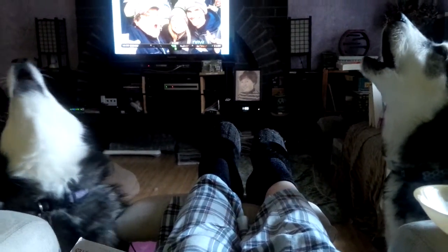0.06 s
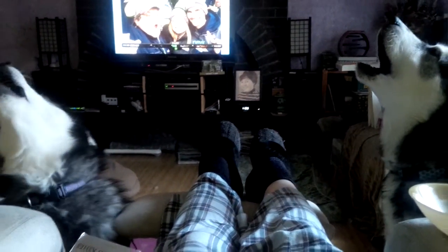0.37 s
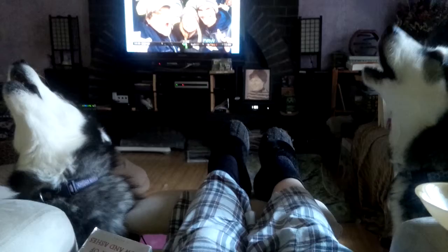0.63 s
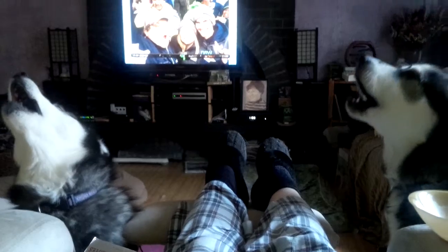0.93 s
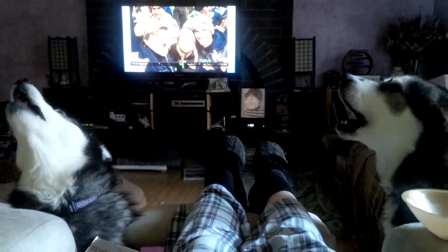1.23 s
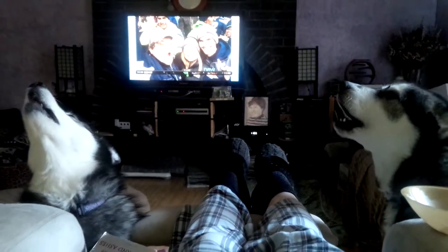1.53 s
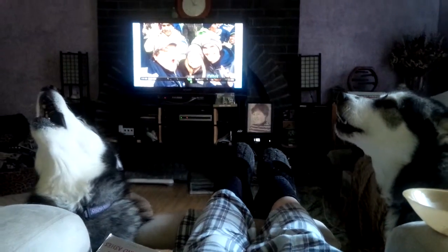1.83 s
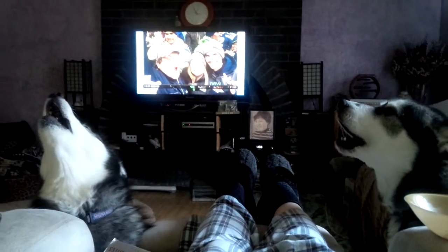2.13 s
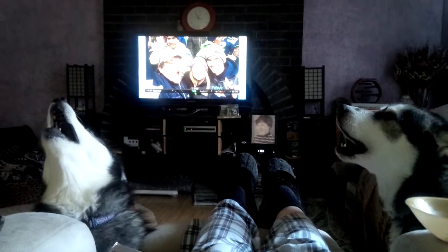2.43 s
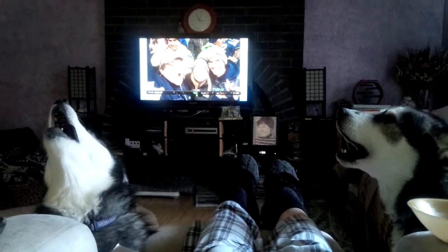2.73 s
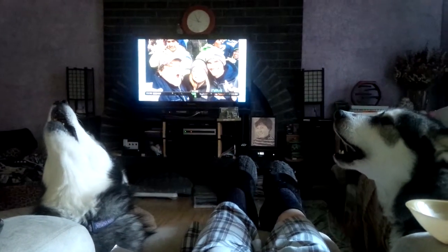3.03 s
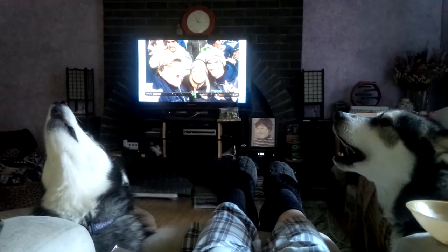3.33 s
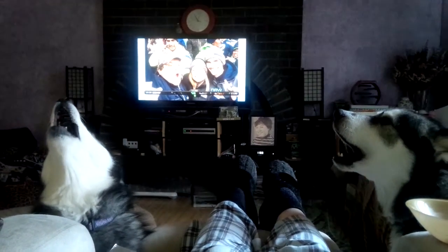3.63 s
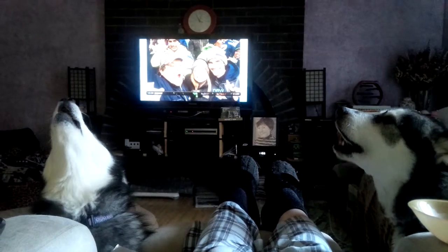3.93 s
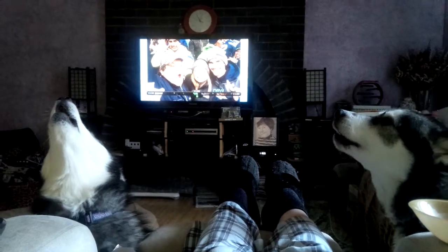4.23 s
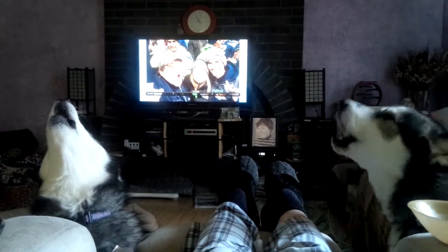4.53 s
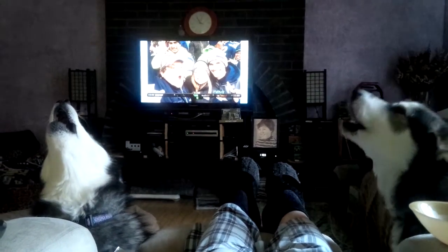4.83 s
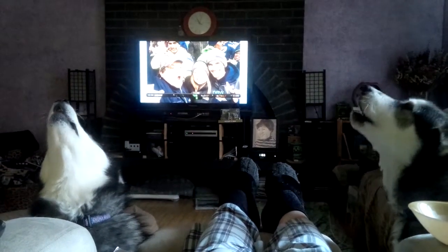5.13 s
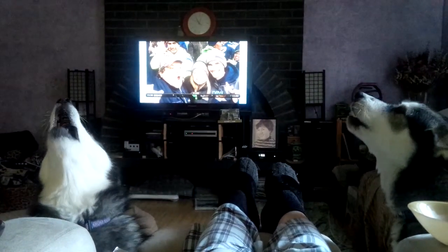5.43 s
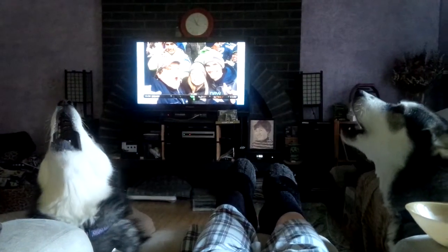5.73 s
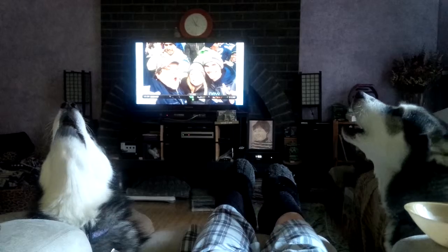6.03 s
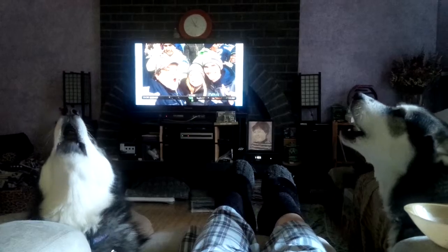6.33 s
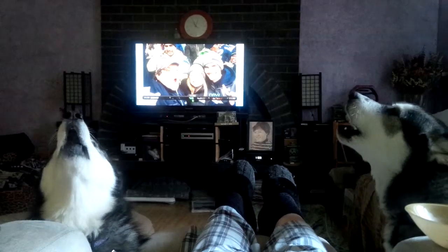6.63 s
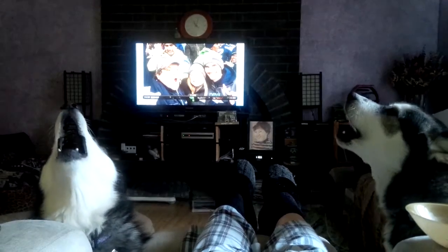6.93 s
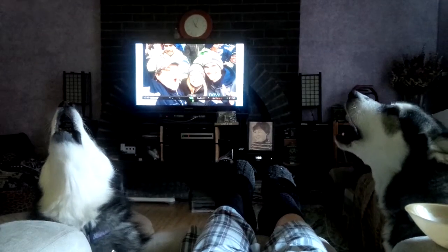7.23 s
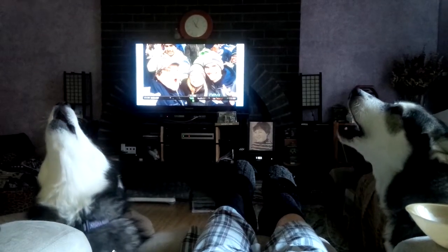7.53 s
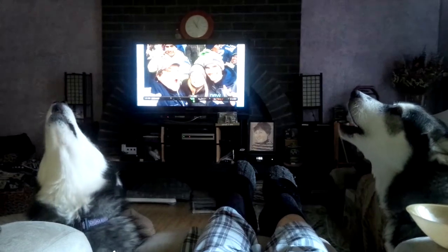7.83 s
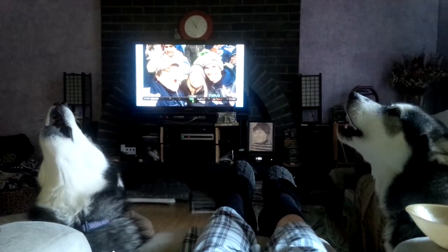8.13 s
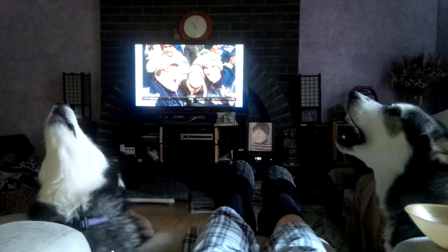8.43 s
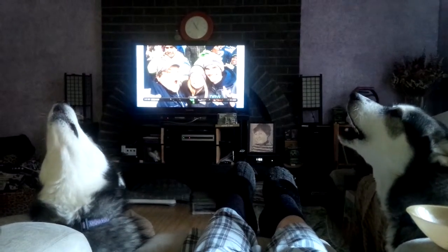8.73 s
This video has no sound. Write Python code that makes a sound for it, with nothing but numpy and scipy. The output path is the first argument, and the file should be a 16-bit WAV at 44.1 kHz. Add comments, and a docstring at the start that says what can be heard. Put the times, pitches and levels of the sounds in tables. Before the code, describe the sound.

A dog's howl and a second dog's high, cracked squeal open a loud duet in a small room with a short echo. The two nearby voices overlap in long, sliding tones, easing off around the middle for gasps, wet lip clicks and a faint whine. They then build again; one dog squeals and restarts hoarsely, and the other's howl briefly roughens into a growl.

```python
"""Two large dogs howl in a living room; their vibrating vocal folds make tones that swoop, hold and beat.
The left dog starts at once, while the right dog cracks into a two-toned squeal before it howls too.
From 2 s the right voice keeps breaking to a lower note. From 3 s come snatched breaths and lip smacks,
and at 4 s a thin whine through the nose. Near 7.5 s the right dog squeals again and starts its last howl
hoarsely; just after 8 s the left dog's voice turns to a growl."""
import sys
import numpy as np
from scipy import signal
from scipy.fft import rfft, irfft, next_fast_len
from scipy.io import wavfile
from scipy.ndimage import uniform_filter1d, map_coordinates

SR = 44100
rng = np.random.default_rng(int(sys.argv[2]) if len(sys.argv) > 2 else 0)


def write(x):
    x = np.atleast_2d(x).T
    wavfile.write(sys.argv[1], SR, np.round(np.clip(x, -1, 1) * 32767).astype(np.int16))


N = 386757
CUTOFF_HZ = 13900

# the tone colour of a rough throat: (frequency [Hz], level [dB])
RASP = [(200, -51.5), (550, 7), (750, -5), (1000, -2.5), (1200, -14), (1450, 0), (1900, -16.5),
        (2300, -2.5), (2800, -22.5), (5000, -22.5), (8000, -17.5), (10000, -26.5), (13000, -38)]
# caps on a voice's parts, before each dog's own gains: (base tone [dB], octave [dB], mouth [dB], edge [dB])
FULL_VOICE = (-11, -18, -20, -43)


def gain_of(db):
    """Turns decibels into a multiplier."""
    return 10 ** (np.asarray(db) / 20)


def evened(x):
    """Scales a signal to an average strength (rms) of 1."""
    return x / np.sqrt(np.mean(x ** 2) + 1e-20)


def eased(x, seconds):
    """Smooths with a moving average."""
    return uniform_filter1d(x, max(int(seconds * SR), 1))


def read(points, hz):
    """Looks up a frequency in a table, blending between rows."""
    f, value = np.transpose(points)
    return np.interp(np.log(hz + 1), np.log(f + 1), value)


def curves(rows):
    """A table's start time, and its other columns sample by sample."""
    times, *columns = np.transpose(rows)
    t = np.arange(times[0], times[-1], 1 / SR)
    return times[0], [np.interp(t, times, c) for c in columns]


def add(mix, start, sound, fade_s=.008):
    """Mixes in a sound with short soft ends."""
    i = np.arange(len(sound))
    fade = np.minimum(np.minimum(i, i[::-1]) / (fade_s * SR), 1)
    part = mix[max(round(start * SR), 0):][:len(sound)]
    part += (sound * np.sin(fade * np.pi / 2) ** 2)[:len(part)]


def noise(spectrum, n):
    """Noise with the given tone colour."""
    white = rfft(rng.standard_normal(next_fast_len(N)))
    hz = np.linspace(0, SR / 2, len(white))
    return evened(irfft(white * gain_of(read(spectrum, hz)))[:n])


def wander(rate_hz, n):
    """A smooth random wobble, up to the given rate."""
    steps = rng.standard_normal(4096)
    return evened(map_coordinates(steps, [np.arange(n) * 2 * rate_hz / SR], order=2, mode="wrap"))


def room_hum():
    """The room's quiet, steady noise."""
    # its tone colour: (frequency [Hz], level [dB])
    colour = [(25, 3), (70, -2.5), (200, -10), (500, -13), (2000, -18), (3000, -23.5), (8000, -34.5),
              (13000, -41.5)]
    return gain_of(-73.5) * np.array([noise(colour, N), noise(colour, N)])


def rumble(effort, breaths, rest_db=-82):
    """Lumpy low noise, partly alike left and right, that swells with hard howling and with gasps."""
    # its tone colour: (frequency [Hz], level [dB])
    colour = [(25, -7.5), (60, -4.5), (140, -3), (280, -2), (380, 0.5), (600, -28), (2000, -75.5)]
    airflow = np.sqrt(abs(eased(breaths ** 2, .022)))
    swell = gain_of(-47) * (effort / gain_of(FULL_VOICE[3])) ** 1.35
    puffs = gain_of(-56) * (airflow / airflow.max()) ** .35
    level = np.sqrt(swell ** 2 + puffs ** 2 + gain_of(rest_db) ** 2)
    shared, unlike = noise(colour, N), .5 * noise(colour, N)
    lumps = gain_of(4.5 * wander(22, N))
    return level * lumps * np.array([shared + unlike, shared - unlike])


def in_room(x, lead_s, balance_db):
    """Sound reaches the nearer side first; the room adds a short wash of echoes."""
    # how long echoes take to fade by 60 dB: (frequency [Hz], time [s])
    fade_times = [(200, .3), (600, .3), (2000, .32), (6000, .26), (13000, .18)]
    # echo strength against the direct sound: (frequency [Hz], level [dB])
    echo_levels = [(200, -19), (550, -8), (1000, 0), (2000, -1.5), (6000, 5), (13000, 4)]
    size = SR // 2
    echoes = rng.standard_normal((2, size)) * (np.arange(size) > .004 * SR)
    hz, t, bands = signal.stft(echoes, SR, nperseg=256)
    alike = np.sinc(hz / 1900)[:, None]  # both sides hear the same bass
    bands[1] = alike * bands[0] + np.sqrt(1 - alike ** 2) * bands[1]
    decay = gain_of(-60 * t / read(fade_times, hz)[:, None])
    decay /= np.sqrt(size * np.mean(decay ** 2, axis=1, keepdims=True))
    tail = signal.istft(bands * decay, SR, nperseg=256)[1]
    n = 2 * next_fast_len((N + SR) // 2)
    f, side = np.fft.rfftfreq(n, 1 / SR), np.array([[.5], [-.5]])
    direct = gain_of(side * balance_db) * np.exp(2j * np.pi * f * side * lead_s)
    echo_gain = gain_of(read(echo_levels, f))
    room = (direct + echo_gain * rfft(tail, n)) / np.sqrt(1 + echo_gain ** 2)
    return irfft(rfft(x, n) * room)[:, :N]


def lip_smacks(decay_s=.0015, lead_s=.01):
    """Wet lips part with tiny clicks."""
    # each smack: (time [s], level [dB], strongest frequency [Hz])
    smacks = [(3.385, -60, 5000), (4.271, -59.5, 4057), (4.303, -44.5, 4800), (5.302, -46.5, 4600),
              (5.327, -40, 4200), (5.358, -60, 4200), (7.913, -39, 4900), (7.96, -37.5, 4300)]
    track = np.zeros(N)
    t = np.arange(-lead_s, 3 * lead_s, 1 / SR)  # silence first, so the fade-in spares the click
    for start, db, hz in smacks:
        hiss = noise([(hz / 4, -22), (hz, 0), (2 * hz, -14), (3 * hz, -30)], len(t))
        add(track, start - lead_s, gain_of(db) * hiss * (t >= 0) * np.exp(-abs(t) / decay_s))
    return track


def gasps():
    """The dogs snatch air through nose and mouth."""
    # each gasp: (time [s], length [s], level [dB], nose share [0-1])
    breaths = [(3.267, 0.21, -53, 0.7), (4.157, 0.32, -54.5, 0.9), (4.257, 0.034, -42, 0.93),
               (4.29, 0.039, -39, 0.98), (5.266, 0.13, -48.5, 0.8), (7.86, 0.17, -42.5, 0.92)]
    # air rushing through the nose: (frequency [Hz], level [dB])
    nose = [(80, -26.5), (250, -5), (400, 0.5), (550, -2), (700, -3.5), (880, -11), (1300, -31.5),
            (2100, -4.5), (2800, -29.5), (6000, -48), (12000, -59.5)]
    # air rushing through the mouth: (frequency [Hz], level [dB])
    mouth = [(100, -20), (300, 5), (700, -5.5), (2200, 5), (4300, 2.5), (6000, -14.5), (9000, -19.5),
             (13000, -39)]
    track = np.zeros(N)
    for start, length, db, nose_share in breaths:
        n = int(length * SR)
        air = nose_share * noise(nose, n) + (1 - nose_share) * noise(mouth, n)
        add(track, start, gain_of(db) * evened(air * np.hanning(n)))
    return track


def vibrate(hz, waver, jitter):
    """The phase of a vibration whose pitch wavers slowly and jitters fast (both as shares of it)."""
    unsteady = 1 + waver * wander(22, len(hz)) + jitter * wander(220, len(hz))
    return 2 * np.pi * np.cumsum(hz * unsteady) / SR


def overtones(phase, hz, colour, orders, db_per_octave=0, ripple_db=0, echo_s=.0031):
    """Flickering multiples of the pitch, shaped by fixed resonances and, if asked, a close echo."""
    step = 64  # samples between level updates
    i, stack, power = np.arange(len(hz)), 0, 1e-20
    hz, tilt = hz[::step], (db_per_octave + 0 * hz)[::step]
    for k in orders:
        ripple = ripple_db * np.cos(2 * np.pi * k * hz * echo_s)
        flicker = 3.33 * wander(9 * step, len(hz))
        db = read(colour, k * hz) + tilt * np.log2(k) + ripple + flicker
        size = gain_of(db) * (k * hz < CUTOFF_HZ)
        stack += np.interp(i, i[::step], size) * np.cos(k * phase)
        power += size ** 2 / 2
    return stack / np.interp(i, i[::step], np.sqrt(power))


def whine(octave_db=-24):
    """A thin, wavering whistle through the nose."""
    # the whistle's path: (time [s], pitch [Hz], level [dB])
    path = [(4.05, 3520, -56), (4.068, 3387, -44.5), (4.158, 3347, -58.5), (4.222, 3400, -92),
            (4.35, 3400, -85), (4.37, 3404, -65), (4.49, 3220, -69.5)]
    start, (hz, level) = curves(path)
    phase = vibrate(hz, waver=.004, jitter=.003)
    return start, np.sqrt(2) * gain_of(level) * (np.cos(phase) + gain_of(octave_db) * np.cos(2 * phase))


def rough_voice(path, orders, jitter, flutter, flutter_hz=60):
    """The vocal folds vibrate unevenly, chopped by a low flutter in the throat."""
    start, (hz, level) = curves(path)
    chop = 1 + flutter * np.cos(vibrate(np.full(len(hz), flutter_hz), .044, .062))
    return start, gain_of(level) * chop * overtones(vibrate(hz, .01, jitter), hz, RASP, orders)


def hoarse_start():
    """A howl begins with a rough throat."""
    # the rough note: (time [s], pitch [Hz], level [dB])
    path = [(7.75, 499, -46), (7.79, 454, -38), (7.84, 485, -35), (7.9, 443, -35), (8.0, 479.5, -54),
            (8.06, 476, -45.5)]
    return rough_voice(path, range(2, 6), jitter=.024, flutter=.56)


def growl():
    """The vibration repeats only every second cycle, adding tones between the usual ones."""
    # the growl's path: (time [s], half the voice's pitch [Hz], level [dB])
    path = [(8.1, 252, -42), (8.15, 283.3, -29.5), (8.22, 277.2, -35.5), (8.3, 266, -45.5),
            (8.35, 246, -57)]
    return rough_voice(path, range(3, 9, 2), jitter=.028, flutter=.61)


def squeals():
    """Two vibrations in one throat disturb each other and make sum and difference tones."""
    # one list a squeal: (time [s], upper tone [Hz], lower tone [Hz], upper [dB], lower [dB], rasp [dB])
    paths = [
        [(0, 1060, 692, -56, -71, -22.5), (.13, 1034, 793, -37, -54, -40),
         (.19, 1036, 830, -16.5, -70.5, -33.5), (.3, 1036, 777, -14, -65, -34.5),
         (.39, 1021, 812, -26.5, -58, -33.5), (.48, 1010, 785, -17.5, -47, -35),
         (.55, 975, 710, -53.5, -47, -32), (.68, 926, 585.4, -44.5, -22, -33), (.74, 815, 633, -39, -28, -33.5)],
        [(7.43, 867, 608.5, -43, -26, -51), (7.49, 917, 612.7, -32, -42, -48.5),
         (7.53, 936.6, 521, -25, -36, -50.5), (7.64, 888, 595, -31, -33.5, -39.5),
         (7.77, 911, 589, -45, -29.5, -53.5)],
    ]
    track = np.zeros(N)
    for path in paths:
        start, (upper_hz, lower_hz, upper_db, lower_db, rasp_db) = curves(path)
        high, low = vibrate(upper_hz, .0015, .003), vibrate(lower_hz, .006, .012)
        tones = gain_of(upper_db) * (np.cos(high) + gain_of(-16) * np.cos(2 * high))
        tones += gain_of(lower_db) * np.cos(low)
        tones += gain_of(rasp_db + 3) * (np.cos(high + low) + gain_of(-20) * np.cos(2 * high - low))
        hiss = gain_of(rasp_db - 6) * noise(RASP, len(tones))
        add(track, start, np.sqrt(2) * tones + hiss)
    return track


def howl_shape(path, throat, edge_law, strain_db, scoop=0, breaks=(), attack_s=.023, release_s=.012):
    """One howl's start, pitch and four levels: base tone, octave, mouth overtones and treble edge."""
    start, (hz, base, mouth) = curves(path)
    t = np.arange(len(hz)) / SR
    hz = eased(hz, .03) * (1 - scoop * (start > 0) * np.exp(-t / .034))
    for at, length, low_hz in breaks:  # a break drops the pitch, thins the base and lifts the overtones
        broken = eased(1. * (start + t > at) * (start + t < at + length), .028)
        hz, base, mouth = hz + broken * (low_hz - hz), base - 10 * broken, mouth + 4 * broken
    easy_db, per_mouth, per_octave = edge_law  # an easy note is 500 Hz with the mouth at -30 dB
    edge = easy_db + strain_db + per_mouth * (mouth + 30) + per_octave * np.log2(hz / 500)
    swell = 20 * np.log10(np.clip(np.minimum(t / attack_s, t[::-1] / release_s), 1e-3, 1))
    return start, hz, [db + swell for db in (base, base + read(throat, 2 * hz), mouth, edge)]


def howl(hz, levels, mouth_colour, edge_colour, crack, shimmer_db, core_db, mouth_db, edge_db, breath_db):
    """A strong base tone; an open mouth adds overtones, and effort a treble edge with pulsing breath."""
    base, octave, mouth, edge = (np.minimum(level, cap) for level, cap in zip(levels, FULL_VOICE))
    # breath in the voice: (frequency [Hz], level [dB])
    breath = [(100, -18), (300, -8), (520, 7), (750, 12.5), (1100, 11.5), (1600, 2), (2350, 5),
              (2800, -10.5), (3600, 1.5), (5000, -15.5), (7500, -6), (10000, -11.5), (13500, -19)]
    glide = uniform_filter1d(abs(np.gradient(np.log(hz))) * SR, size=1200)
    phase = vibrate(hz, waver=.0014, jitter=.0012 + crack * np.minimum(glide, 5))  # leaps are unsteady
    effort = np.clip(edge + 50, -25, 1)
    tilt = .33 * effort  # soft notes are darker
    core = np.sqrt(2) * (gain_of(base) * np.cos(phase) + gain_of(octave) * np.cos(2 * phase))
    bright = gain_of(mouth + mouth_db) * overtones(phase, hz, mouth_colour, range(3, 8))
    bright += gain_of(edge + edge_db) * overtones(phase, hz, edge_colour, range(5, 27), tilt, 2.5)
    air = gain_of(edge + breath_db + .12 * effort) * noise(breath, len(hz)) * (1 + .5 * np.cos(phase))
    shimmer = gain_of(shimmer_db * wander(35, len(hz)))
    return gain_of(core_db) * core + bright * shimmer + air


def left_howls():
    """Six howls and the effort behind them; all but the first scoop up into their note."""
    # one list a howl: (time [s], pitch [Hz], base tone [dB], mouth overtones [dB])
    paths = [
        [(0, 534.5, 1, 9), (.06, 503, -18, -29.5), (.2, 466.4, -19, -27.5), (.3, 455.5, -18.5, -34.5),
         (.4, 468.4, -14, -27.5), (.48, 486.2, -13.5, -22.5), (.6, 486, -14, -20.5), (.73, 475.7, -14.5, -30.5),
         (.89, 503, -25, -26.5), (.98, 543.4, -33, -24.5), (1.11, 558.2, -24, -24), (1.28, 551, -27.5, -30.5),
         (1.37, 474.5, -30, -43.5)],
        [(1.68, 614.2, -22, -30), (1.82, 618, -17, -24.5), (1.99, 588, -21.5, -31.5),
         (2.1, 564.9, -17.5, -22.5), (2.24, 532, -30, -35), (2.33, 557, -19.5, -27), (2.5, 595, -20, -30),
         (2.6, 601.2, -20, -37), (2.73, 609.2, -26.5, -29), (2.81, 590.3, -15.5, -27.5),
         (2.88, 580.7, -16, -24.5), (3.0, 496.6, -20.5, -27), (3.08, 511.7, -14.5, -25.5),
         (3.24, 486.3, -30, -47.5)],
        [(3.45, 627, -18.5, -28), (3.62, 614, -16, -28.5), (3.76, 578, -30, -31.5), (3.83, 507.4, -21, -26),
         (3.9, 465, -24, -45), (3.97, 406, -39.5, -31), (4.05, 374, -40, -56), (4.16, 363, -43.5, -65),
         (4.33, 363, -43.5, -86), (4.54, 386, -34.5, -64.5), (4.62, 411, -32.5, -52.5), (4.8, 439, -25.5, -39),
         (4.92, 477, -24.5, -47), (5.02, 471.7, -20, -33), (5.11, 394, -31, -36), (5.24, 377, -44, -55)],
        [(5.42, 590.2, -16, -31), (5.58, 608.8, -20.5, -26.5), (5.69, 607.8, -20.5, -34.5),
         (5.83, 608.3, -31, -34), (5.94, 587, -19.5, -29), (6.05, 500, -26.5, -37.5), (6.18, 493, -15.5, -32.5),
         (6.26, 533, -33, -40.5), (6.38, 542.4, -22.5, -39), (6.52, 516, -42.5, -55)],
        [(6.77, 660, -26.5, -32.5), (6.86, 653.5, -22.5, -31), (6.95, 653.4, -28, -35), (7.06, 634, -21, -34.5),
         (7.13, 610.5, -27, -29), (7.3, 502.4, -33, -54), (7.4, 469, -29, -61.5), (7.47, 406.5, -41, -32),
         (7.54, 383.3, -40, -44), (7.72, 402, -47, -64), (7.81, 424, -38, -44), (8.03, 420, -50, -68)],
        [(8.07, 584, -17.5, -33), (8.22, 553.4, -23.5, -31.5), (8.35, 486.4, -24.5, -39.5),
         (8.4, 406, -39, -49.5), (8.46, 396.6, -48, -42), (8.55, 383, -61.5, -71), (8.67, 369, -52, -72)],
    ]
    # how hard each howl is pushed: (extra edge [dB])
    strains = [5, 3, 3, 0.5, 3.5, 6.5]
    # the throat's gain for the octave, against the base tone: (frequency [Hz], gain [dB])
    throat = [(735, -0.5), (790, -5), (860, 4), (930, -16.5), (975, -15.5), (1034, -1), (1085, -1.5),
              (1178, -9.5), (1208, 11), (1240, -10.5), (1300, -9)]
    # the mouth's resonances: (frequency [Hz], level [dB])
    mouth = [(1000, 8.5), (1450, 13), (1780, -9.5), (1950, -6.5), (2200, -3), (2420, -12.5), (2580, -18),
             (2720, -29), (3300, -92.5)]
    # the treble edge's colour: (frequency [Hz], level [dB])
    edge = [(2400, -66.5), (2780, -11), (3050, -1), (3350, 1.5), (3850, 2.5), (4300, -3.5), (4800, -11),
            (5280, 3), (5800, -2.5), (7250, 1.5), (8300, -7.5), (9500, -17), (11500, -15), (13500, -21)]
    # how the edge grows: (easy note [dB], with mouth overtones [dB/dB], with pitch [dB/octave])
    edge_law = (-59, 0.42, 28.2)
    voice, effort = np.zeros((2, N))
    for path, strain_db in zip(paths, strains):
        start, hz, levels = howl_shape(path, throat, edge_law, strain_db, scoop=.2)
        add(voice, start, howl(hz, levels, mouth, edge, crack=.002, shimmer_db=3.03,
                               core_db=-1.5, mouth_db=-.5, edge_db=-1.5, breath_db=-4))
        add(effort, start, gain_of(levels[3] - strain_db))
    return voice, effort


def right_howls():
    """Three howls; the first keeps breaking down into the dog's low voice."""
    # one list a howl: (time [s], pitch [Hz], base tone [dB], mouth overtones [dB])
    paths = [
        [(.71, 587.5, -15, -33), (.75, 543.7, -14, -37), (.9, 532, -14.5, -34), (1.02, 533, -17, -40),
         (1.21, 528.5, -16.5, -31.5), (1.39, 584, -15, -35), (1.47, 580.2, -13.5, -50), (1.53, 584, -17, -30),
         (1.63, 523, -16.5, -38.5), (1.8, 458, -26, -41.5), (1.92, 430.7, -30, -28.5), (2.0, 496.2, -18, -49),
         (2.07, 523.2, -21.5, -33.5), (2.18, 498, -20.5, -47.5), (2.31, 543.3, -18.5, -36),
         (2.55, 528, -22, -42), (2.7, 546, -22.5, -41.5), (2.95, 542.2, -23, -35.5), (3.12, 532.3, -24, -45.5),
         (3.2, 553, -16.5, -34.5), (3.33, 554, -16.5, -33.5), (3.44, 552.8, -18, -37.5),
         (3.53, 551, -24.5, -47.5), (3.65, 540.6, -25.5, -37), (3.75, 579.6, -15.5, -55.5),
         (3.87, 623, -25, -51), (3.95, 587.5, -27.5, -73)],
        [(4.57, 390.4, -36, -27), (4.62, 466.4, -18.5, -36), (4.68, 494.6, -16, -27.5), (4.76, 432, -30, -33.5),
         (4.82, 418.2, -29.5, -33.5), (4.88, 440.8, -24.5, -25.5), (4.94, 482, -16, -38.5),
         (5.0, 480, -18, -34), (5.13, 442, -27.5, -30.5), (5.22, 444, -25.5, -31), (5.4, 465, -19, -31.5),
         (5.49, 411.3, -33, -28.5), (5.56, 410, -23.5, -42.5), (5.63, 420, -28.5, -32.5),
         (5.75, 538, -18.5, -36), (5.81, 548, -18, -32), (5.9, 525.4, -19.5, -34.5), (6.09, 517.5, -19, -37),
         (6.18, 497.8, -19, -30.5), (6.4, 515.3, -20, -43.5), (6.56, 503.1, -20, -38.5),
         (6.76, 509.3, -20.5, -42.5), (6.86, 494, -28.5, -37.5), (6.95, 478, -24.5, -45),
         (7.01, 512.4, -22, -41), (7.08, 559, -24.5, -33.5), (7.2, 564, -20.5, -56), (7.3, 569, -19.5, -36),
         (7.44, 561, -20.5, -41.5), (7.51, 584, -24, -34)],
        [(7.76, 535, -19, -36), (7.8, 511, -22.5, -45), (7.95, 489, -20, -53.5), (8.05, 481, -20.5, -45.5),
         (8.15, 473, -24.5, -49.5), (8.3, 529, -20, -50.5), (8.36, 557.5, -20.5, -33),
         (8.46, 580.3, -18.5, -38), (8.68, 593, -19.5, -44), (8.77, 582, -16, -30.5)],
    ]
    # how hard each howl is pushed: (extra edge [dB])
    strains = [0, 1.5, -2]
    # the voice breaks: (time [s], length [s], pitch [Hz])
    breaks = [(2.085, .045, 429), (2.35, .045, 450), (2.585, .085, 452), (2.775, .145, 457),
              (2.995, .11, 441)]
    # the throat's gain for the octave, against the base tone: (frequency [Hz], gain [dB])
    throat = [(825, -21.5), (868, -7), (888, -6), (915, -15), (950, -21.5), (1010, -27), (1075, -27),
              (1108, -13.5), (1145, -35.5)]
    # the mouth's resonances: (frequency [Hz], level [dB])
    mouth = [(1000, 17.5), (1400, 0), (1650, -3), (1850, -17.5), (2050, 7), (2280, -0.5), (2400, -8.5),
             (2580, -19), (2720, -40), (3300, -91)]
    # the treble edge's colour: (frequency [Hz], level [dB])
    edge = [(2400, -57), (2780, 0), (3200, 3), (3800, -9), (4500, -4), (5200, -6.5), (6000, -1.5),
            (7000, 0), (8200, -11.5), (9500, -18), (11500, -10), (13500, -19)]
    # how the edge grows: (easy note [dB], with mouth overtones [dB/dB], with pitch [dB/octave])
    edge_law = (-59, 0.12, 7.1)
    voice = np.zeros(N)
    for path, strain_db in zip(paths, strains):
        start, hz, levels = howl_shape(path, throat, edge_law, strain_db, breaks=breaks)
        add(voice, start, howl(hz, levels, mouth, edge, crack=.0045, shimmer_db=2.5,
                               core_db=4, mouth_db=-2, edge_db=0, breath_db=-1))
    return voice


def scene():
    """Both dogs in the room, over its quiet hum."""
    left, effort = left_howls()
    right = right_howls()
    breaths = gasps()
    right += squeals()
    add(right, *hoarse_start())
    add(left, *growl())
    add(right, *whine())
    left += breaths + lip_smacks()
    hum = room_hum()
    dogs = in_room(left, lead_s=.00023, balance_db=0) + in_room(right, lead_s=-.000093, balance_db=1.1)
    return hum + rumble(effort, breaths) + dogs


def record(dry):
    """Cuts off the highest treble."""
    low_pass = signal.firwin(511, CUTOFF_HZ, window=("kaiser", 9), fs=SR)
    return signal.oaconvolve(dry, low_pass[None], "same")


dry = scene()
out = record(dry)
write(out)
```